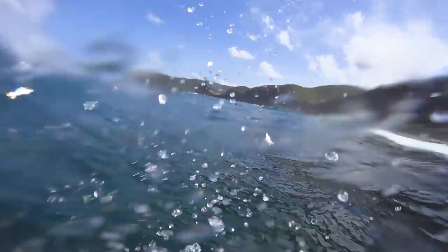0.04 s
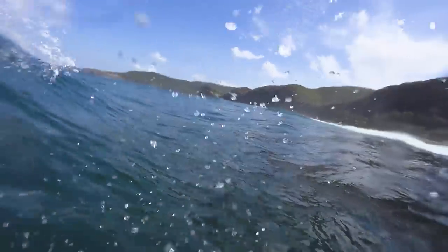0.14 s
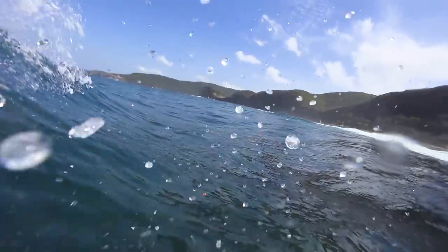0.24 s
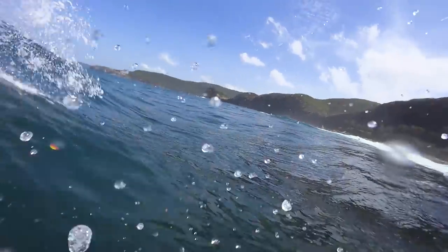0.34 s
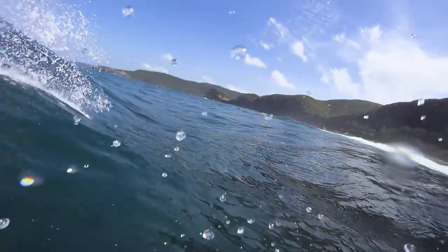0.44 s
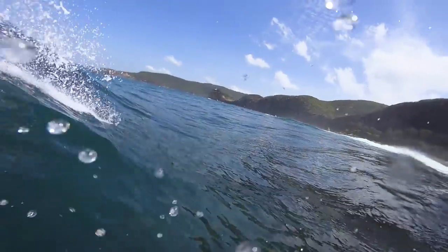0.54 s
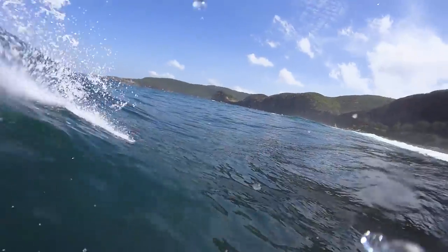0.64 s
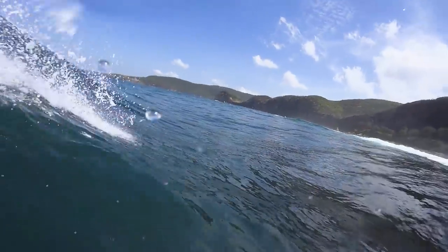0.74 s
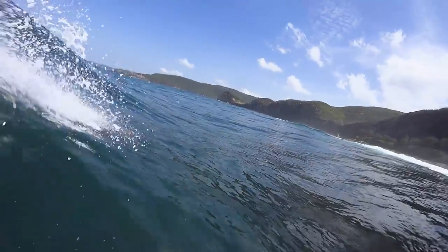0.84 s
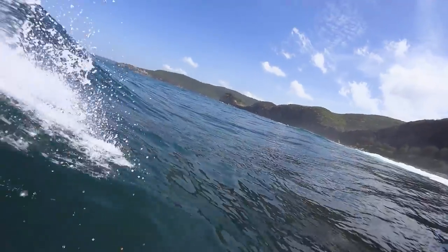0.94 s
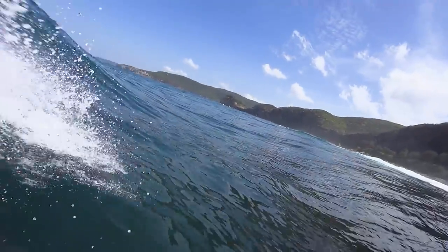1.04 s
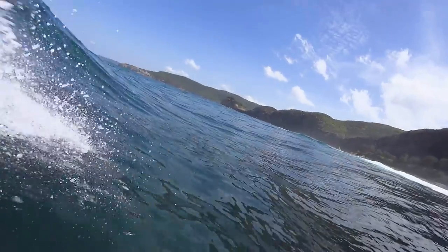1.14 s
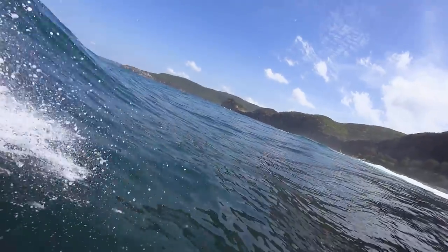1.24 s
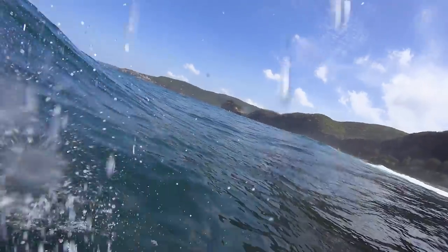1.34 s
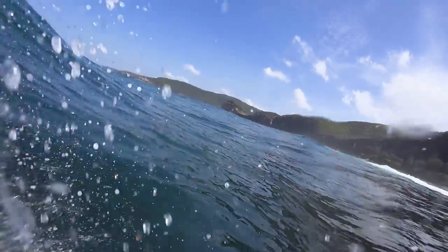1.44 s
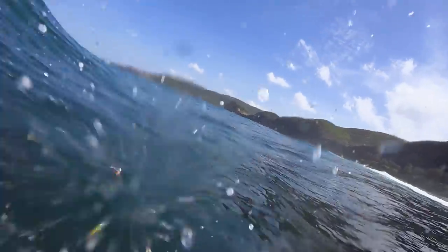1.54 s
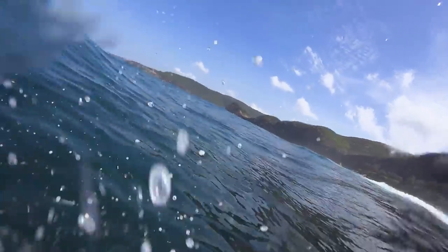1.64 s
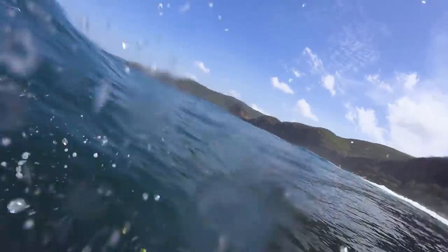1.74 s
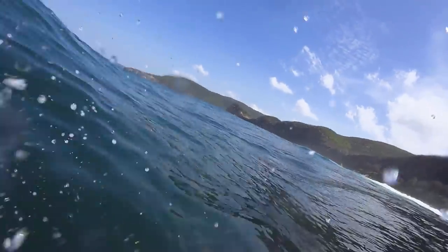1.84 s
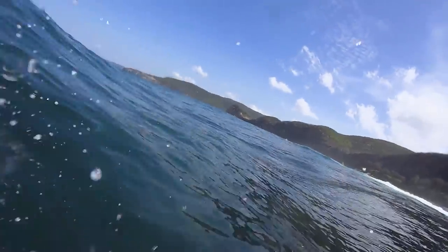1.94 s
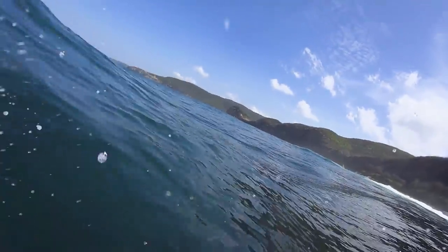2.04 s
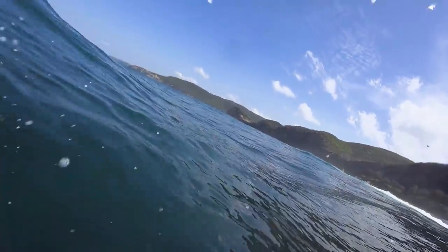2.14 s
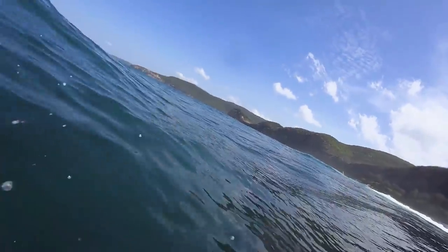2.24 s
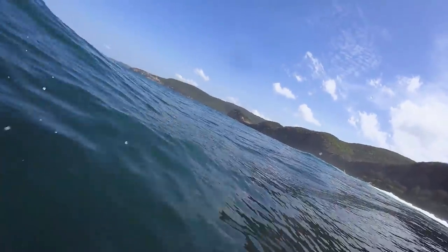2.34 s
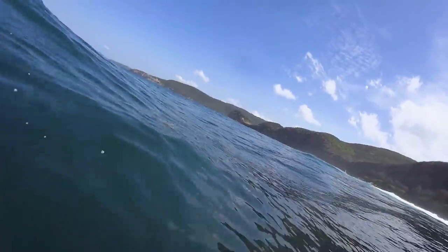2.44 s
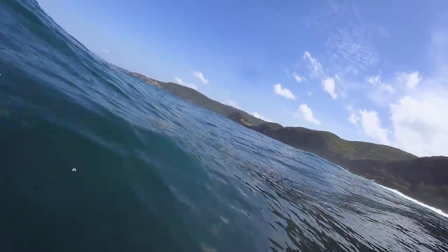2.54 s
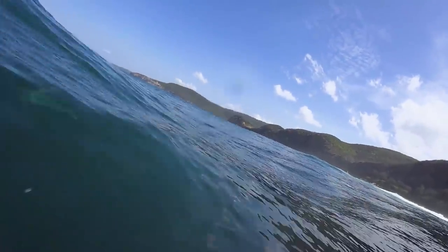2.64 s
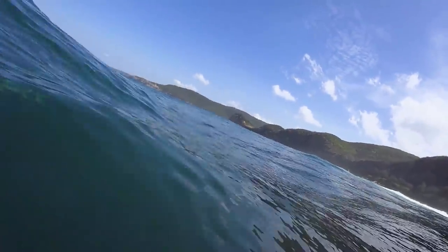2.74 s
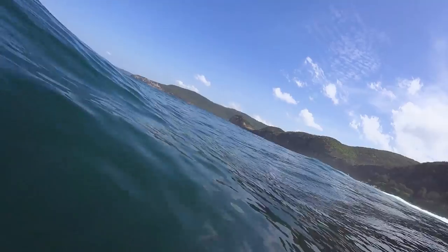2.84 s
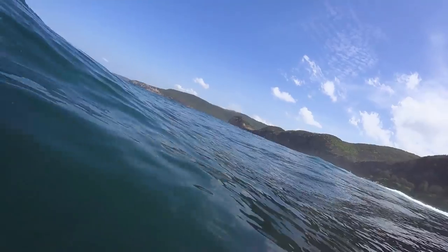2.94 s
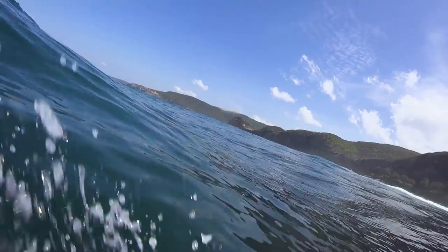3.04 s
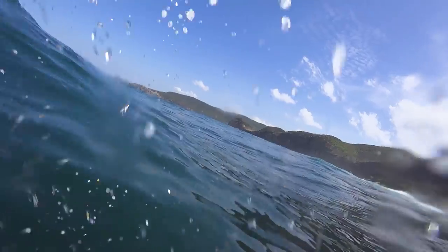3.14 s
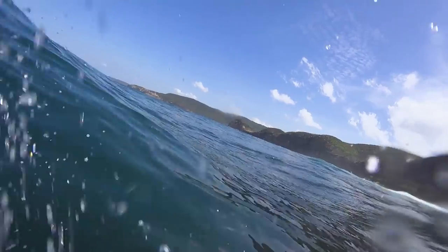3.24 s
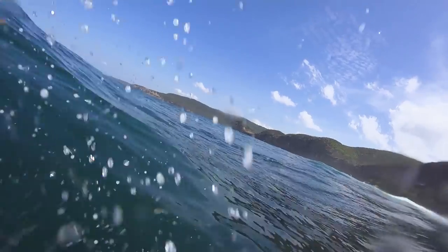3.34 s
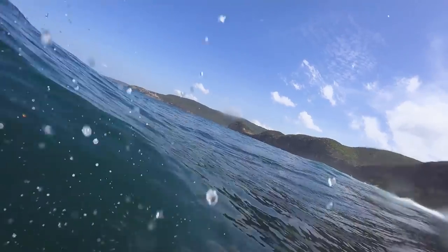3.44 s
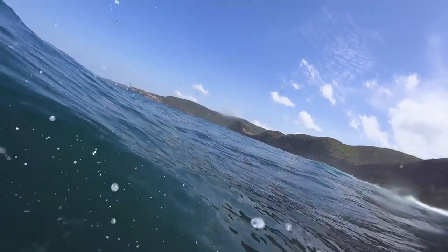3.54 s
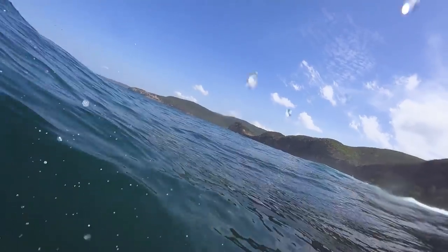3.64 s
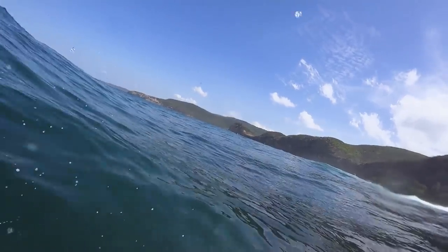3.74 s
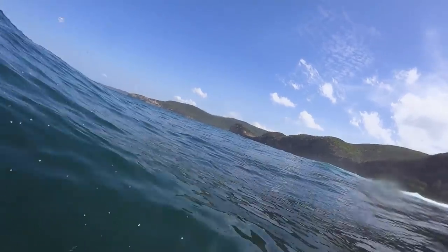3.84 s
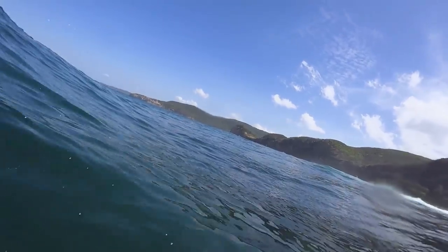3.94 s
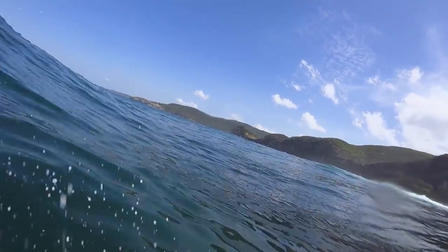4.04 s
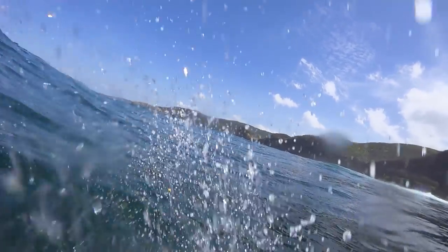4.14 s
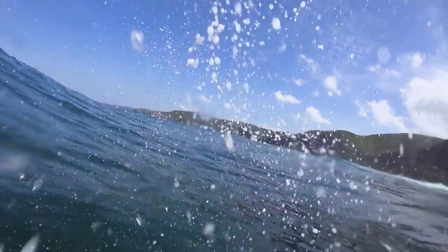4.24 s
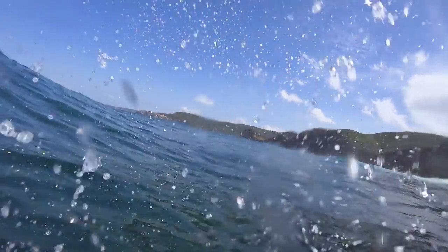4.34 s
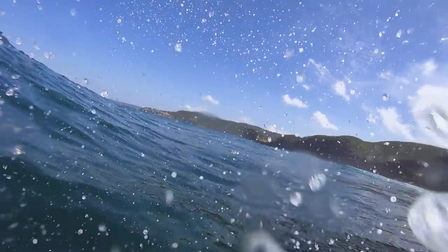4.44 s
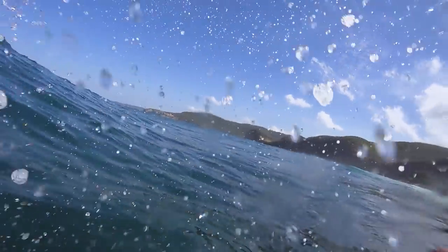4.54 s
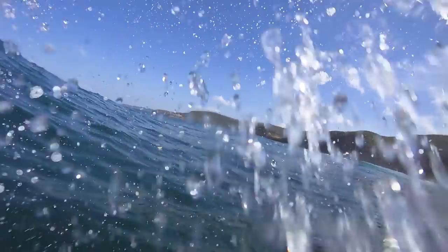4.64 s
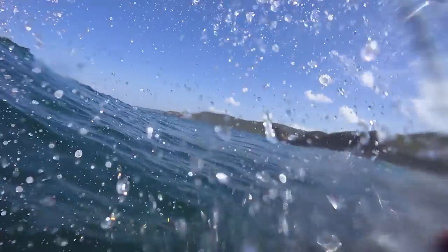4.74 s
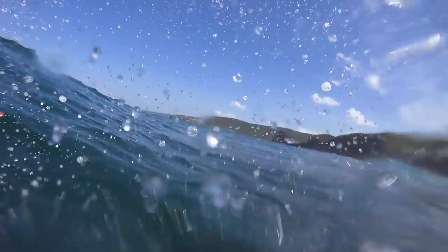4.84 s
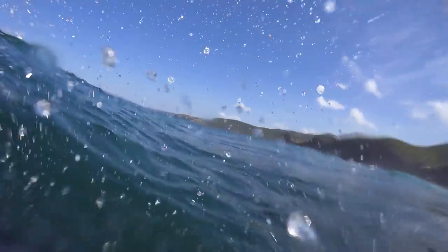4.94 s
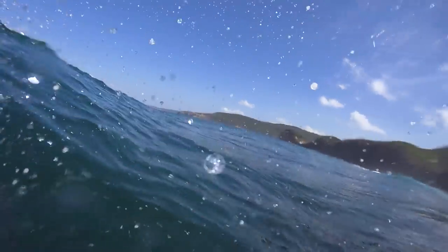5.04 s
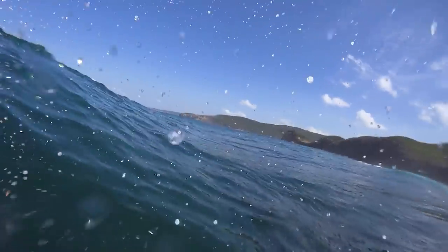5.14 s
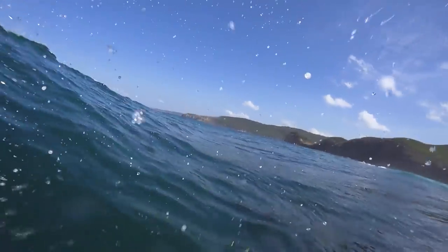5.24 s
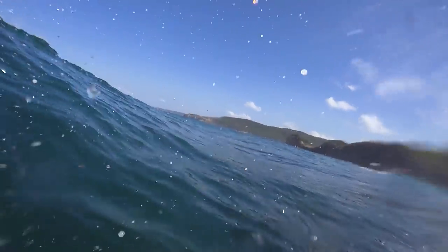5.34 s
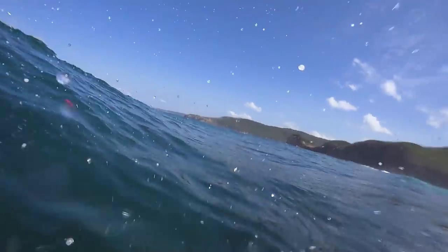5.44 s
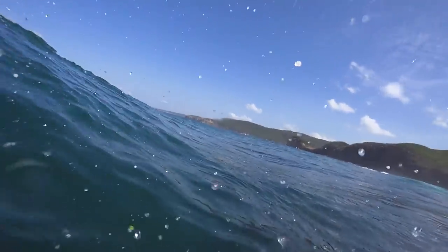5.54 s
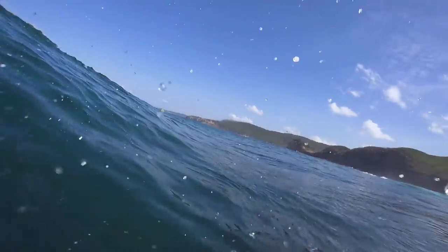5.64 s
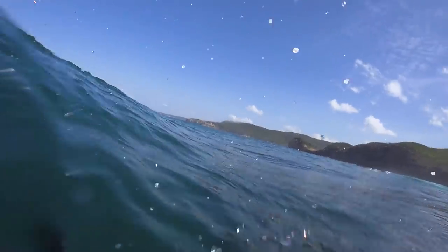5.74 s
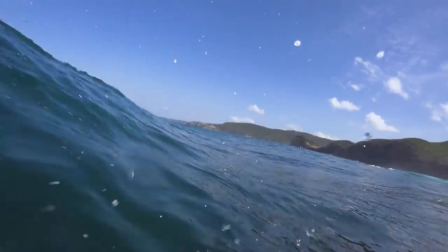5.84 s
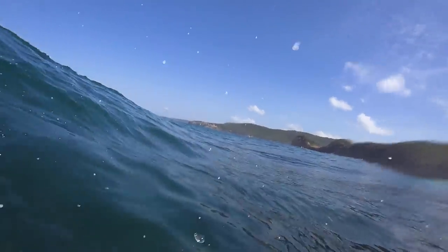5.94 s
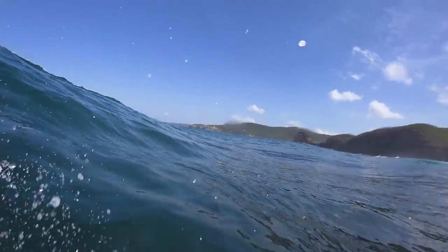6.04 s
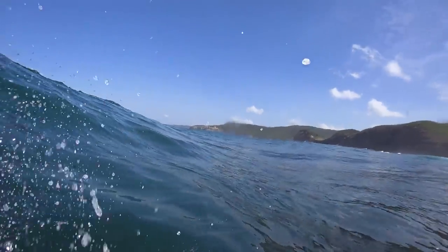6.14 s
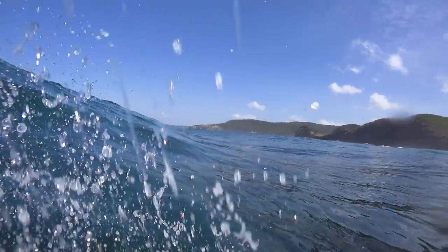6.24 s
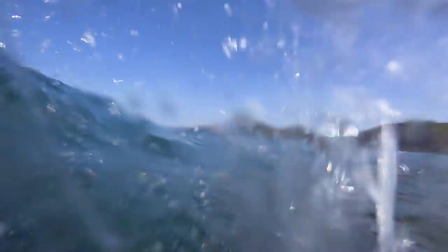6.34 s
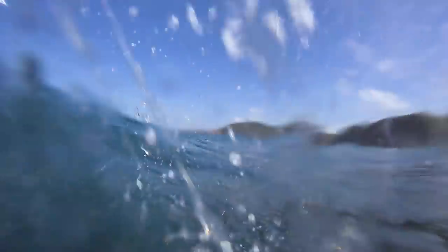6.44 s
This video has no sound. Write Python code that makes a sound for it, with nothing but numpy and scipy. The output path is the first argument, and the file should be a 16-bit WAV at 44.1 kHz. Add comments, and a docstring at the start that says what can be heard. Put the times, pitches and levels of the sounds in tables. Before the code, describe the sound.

A microphone in a sealed housing bobs on the ocean surface. A spatter of spray opens, then three stronger bouts of splashing hit the shell, with gurgling plops, fizzing whitewater and a low rumble as the swell shoves it. Quieter gaps hold gentle lapping, scattered drips and a very faint hiss of distant surf. After a calmer stretch, a sharp splash lands right at the end.

```python
"""Afloat beside a breaking wave

A camera in a sealed housing floats on the sea, its two microphone ports at the waterline.
Close up, spray slaps the housing in bursts, whitewater hisses, drops tap and air pockets plop;
the swell pushes the housing and shakes its mount. The ports hear the shell's low ring in nearly
opposite phase. Underneath lie lapping ripples, one faint hum and the hiss of distant surf."""
import sys
import numpy as np
from scipy import signal
from scipy.fft import rfft, irfft, next_fast_len
from scipy.io import wavfile
from scipy.ndimage import uniform_filter1d

SR = 44100
rng = np.random.default_rng(int(sys.argv[2]) if len(sys.argv) > 2 else 0)


def wrap_up_sound(samples):
    """Save the sound to the file named by the first command line argument, as 16-bit audio."""
    columns = np.atleast_2d(samples).T
    # keep every value between -1 and 1, then stretch to whole-number steps
    tamed = np.clip(columns, -1, 1)
    steps = np.round(tamed * 32767).astype(np.int16)
    wavfile.write(sys.argv[1], SR, steps)


N = 286209
FFT_SIZE = next_fast_len(N + SR // 4)

# water hitting the housing: start_s, level_db, thud_relative_db, spray_relative_db, length_s
SLAPS = [(0.01, -22.5, 9.5, -11.5, 0.0034), (0.045, -28.5, 1, -20, 0.0083), (0.064, -28.5, 0, -13, 0.0047),
         (0.07, -24, -0.5, -23, 0.0074), (0.148, -34.5, 9, -31, 0.015), (0.187, -27.5, -3, -10, 0.005),
         (0.215, -31.5, 8.5, -14, 0.017), (0.283, -38.5, 11, -10, 0.016), (1.456, -17.5, 1.5, -19.5, 0.014),
         (1.485, -17, 4.5, -34, 0.008), (1.519, -29, 16, -6, 0.0048), (1.531, -26.5, 21, -29, 0.0047),
         (1.549, -33.5, 5, -17, 0.0063), (1.658, -11, -5, -30, 0.0057), (1.696, -36.5, 10, -2, 0.0033),
         (1.76, -30, 10.5, -19, 0.016), (1.82, -39, 17, -30, 0.033), (3.121, -24, 7, -36, 0.0037),
         (3.198, -27, 12, -31, 0.019), (3.257, -15.5, -1, -15, 0.012), (3.29, -24, 12, -14, 0.0086),
         (3.42, -25, 9.5, -17, 0.012), (3.461, -30, 8, -33, 0.0032), (3.5, -31, 22, -41, 0.0059),
         (3.515, -26, 12.5, -33, 0.0068), (4.02, -34.5, 9.5, -14.5, 0.015), (4.168, -33, 12, -31.5, 0.12),
         (4.218, -21, 10.5, -15.5, 0.038), (4.249, -16.5, 2, -34, 0.025), (4.297, -18.5, 9.5, -16.5, 0.013),
         (4.33, -26, 17, -19, 0.017), (4.384, -29.5, 16, -13, 0.017), (4.415, -21.5, 6.5, -19.5, 0.011),
         (4.48, -34, 2.5, -11, 0.011), (4.502, -27, 4, -20.5, 0.022), (4.556, -23.5, 10.5, -19.5, 0.031),
         (4.581, -20.5, 0.5, -17.5, 0.017), (4.689, -25.5, -0.5, -15, 0.0098),
         (4.696, -16, 6.5, -13.5, 0.014), (4.752, -26.5, 6, -10.5, 0.033), (4.79, -31.5, 3, -18, 0.026),
         (5.148, -35.5, 2, -3, 0.0016), (5.437, -44, 5.5, -8.5, 0.009), (5.964, -39, 3, -18, 0.009),
         (6.406, -15, 5.5, -17.5, 0.0075), (6.423, -18, 6, -16, 0.024), (6.452, -23.5, 10, -13.5, 0.11)]
# the whitewater's hiss: time_s, level_db
HISS_LEVELS = [(0, -39), (0.33, -45.5), (0.7, -48), (1.43, -44), (1.49, -36.5), (1.62, -39.5),
               (1.92, -41.5), (2.05, -56), (2.85, -53), (3.02, -42.5), (3.45, -41.5), (3.65, -56),
               (4.1, -48.5), (4.25, -29), (4.45, -44), (4.77, -44), (4.86, -51), (6.0, -51.5),
               (6.15, -45.5), (6.38, -40.5), (6.49, -38)]
# surges of swell against the housing: start_s, hold_s, push_db, wobble_db
SURGES = [(0.0, 0.014, -22, -26.5), (0.227, 0.0078, -24, -23), (1.51, 0.037, -28.5, -22),
          (1.904, 0.042, -34, -29), (2.207, 0.025, -29, -39.5), (2.485, 0.057, -25, -37),
          (3.212, 0.17, -31, -26), (3.526, 0.078, -24, -24), (3.679, .18, -25.5, -25.5),
          (4.243, 0.22, -35, -30), (4.409, 0.019, -21, -14.5), (4.697, 0.056, -19, -21.5),
          (6.432, .06, -20.5, -20)]
# trapped air pockets, single drops and, near 70 Hz, the mount ringing low after hits: start_s, level_db,
# pitch_hz, glide_octaves
PLOPS = [(.011, -21.5, 2500, 0.22), (0.214, -11, 220, -1.4), (0.41, -24, 285, -0.46),
         (0.646, -36, 258, -0.07), (1.262, -30, 730, 0), (1.394, -29, 332, 0.024),
         (1.485, -15.5, 70, -0.17), (1.529, -17.5, 160, -.1), (1.653, -12, 1788, 0.022),
         (1.667, -19, 317, -0.28), (1.891, -17, 85.7, -0.43), (2.227, -28.5, 128.4, -0.38),
         (2.547, -31, 356, -0.2), (2.947, -32.5, 1870, -0.1), (3.26, -12.5, 342, -0.08),
         (3.289, -15, 351, -0.1), (3.508, -10.5, 71.7, 0.19), (3.53, -30, 3200, 0),
         (4.031, -31.5, 1914, -0.16), (4.3, -9, 938, -0.18), (4.427, -19, 340, 0.055),
         (4.44, -8.5, 73, -0.089), (4.555, -15.5, 340, -0.46), (4.637, -17.5, 155, -0.026),
         (4.71, -20, 63.6, 0.37), (4.948, -38, 945, 0), (5.297, -46.5, 4500, -0.18),
         (5.397, -42.5, 2580, 0.54), (5.5, -39, 813, -0.18), (5.657, -43, 1990, 0),
         (5.929, -28, 1960, -0.06)]
# a faint hollow hum: start_s, end_s, level_db, from_hz, to_hz
HUM = (2.64, 2.83, -44, 245, 230)
# resonances, five sets: centre_hz, width_hz, level_db
SHELL_MODES = [(165.5, 88, -2), (257.5, 74, -2.5), (340, 110.4, -2), (442, 104, -4)]  # the housing's low ring
PORT_MODES = [(573, 447, 5), (894, 580, -2.5), (1412, 410, 1.5), (1834, 470, 2), (2620, 550, -4)]  # ports and thin panels
SPRAY_MODES = [(3527, 1700, 4.5), (4600, 3800, -1.5), (6630, 600, -16)]  # the treble of the spray
HEAVE_MODES = [(13.6, 20.6, 0)]  # the swell's slow push
MOUNT_MODES = [(68.9, 28.5, 3.5), (99, 117, -10)]  # the mount's wobble
# the microphone pair: frequency_hz, likeness (0-1), left_lead_rad, left_over_right_db
PORT_PAIR = [(150, .92, 3.2, -1), (340, .86, 2.7, -2), (450, .9, 2.9, -1.5), (690, .87, 2.7, -2),
             (940, .85, 1.4, 0), (1200, .45, 1.8, -3), (1480, .9, 2.3, -2), (1950, .96, 1.6, -3),
             (2500, .75, 1.3, -5), (3100, .3, .8, 2), (3700, .68, -.2, 2), (5300, .3, -.6, 2),
             (7500, .55, -1, 3)]

SURGE_RISE_DB_PER_S, PUSH_FALL_DB_PER_S, WOBBLE_FALL_DB_PER_S = 422.5, 78, 129
CALM_PUSH_DB, CALM_WOBBLE_DB = 14.5, -1.5  # between surges, relative to the hiss
BOOM_OVER_HISS_DB, BOOM_OVER_WOBBLE_DB = 6.5, -7.5
PLOP_T60_S, PLOP_DAMPING = 0.035, 0.79  # ring time at 1 kHz; it shortens as this power of the pitch
LAPPING_DB, FAR_SURF_DB = -54, -66
CUTOFF_HZ = 7750


def slaps():
    """Water strikes right at the microphones: grainy bursts drive shell, ports and treble."""
    power, age = np.zeros((3, N + SR)), np.arange(SR // 8) / SR
    for start, db, thud_db, spray_db, length in SLAPS:
        span = max(length, .002) * np.array([[1.5], [1], [.9]])  # the shell rings on
        rise = 1 - np.exp(-age / (0.024 * span))
        burst = rise * gain_of(db + np.array([[thud_db], [0], [spray_db]]) - 5.53 * (age / span) ** 1.28)
        power[:, round(start * SR):][:, :len(age)] += burst ** 2
    clumps = [flicker(0.0021, 3.54), flicker(0.0021, 4.93), flicker(0.00047, 8.7)]
    envelope = np.sqrt(power[:, :N]) * clumps
    return envelope[:, None] * rng.standard_normal((3, 2, N))


def whitewater():
    """The wave breaks close by: a boom drives the shell, patchy hiss the ports and treble."""
    frames = N // 128 + 5
    a, b, c, d, patches = rng.standard_normal((frames, 257, 5)).T
    patches = uniform_filter1d(patches, 6, axis=0)  # across pitch
    patches = unit_rms(uniform_filter1d(patches, 20, axis=1))  # across time
    spectra = np.array([a + 1j * b, c + 1j * d]) * gain_of(0.65 * patches)
    hiss = unit_rms(signal.istft(spectra, nperseg=512, noverlap=384)[1][:, :N])
    foam = hiss * flicker(0.0034, 1.0) * gain_of(hiss_db())
    _, wobble_db = surge_levels()
    shaking = np.hypot(gain_of(hiss_db() + BOOM_OVER_HISS_DB), gain_of(wobble_db + BOOM_OVER_WOBBLE_DB))
    boom = rng.standard_normal((2, N)) * flicker(.03, 2.73) * shaking
    fizz = gain_of(-15.5) * foam[::-1]
    far_surf = gain_of(FAR_SURF_DB) * rng.standard_normal((2, N))
    return np.array([boom, foam, fizz + far_surf])


def hiss_db():
    """The whitewater's level at every sample."""
    return np.interp(np.arange(N) / SR, *np.transpose(HISS_LEVELS))


def swell():
    """Slow pushes, alike on both ports, and a damped wobble of the mount, nearer the right port."""
    push_db, wobble_db = surge_levels()
    shared, left, right, own_left, own_right = rng.standard_normal((5, N))
    push = ring(np.array([shared + .4 * left, shared + .4 * right]), HEAVE_MODES)
    push *= gain_of(push_db) * flicker(.06, 3.25)
    wobble = ring(np.array([left + 0.71 * own_left, left + 0.64 * own_right]), MOUNT_MODES)
    wobble *= gain_of(wobble_db + [[-3], [3]]) * flicker(0.043, 2.62)
    return push + wobble


def surge_levels():
    """Push and wobble in dB: every surge rises fast, holds and ebbs, added in power to the calm."""
    t = np.arange(N) / SR
    power = gain_of(hiss_db() + [[CALM_PUSH_DB], [CALM_WOBBLE_DB]]) ** 2
    fall = np.array([[PUSH_FALL_DB_PER_S], [WOBBLE_FALL_DB_PER_S]])
    for start, hold, *levels_db in SURGES:
        below_db = SURGE_RISE_DB_PER_S * np.maximum(start - t, 0) + fall * np.maximum(t - start - hold, 0)
        power += gain_of(np.array(levels_db)[:, None] - np.minimum(below_db, 200)) ** 2
    return 10 * np.log10(power)


def plops():
    """Trapped air, single drops and the mount's low ring after hits sound as dying tones: row 0 the low tones,
    row 1 the high drops."""
    out, age = np.zeros((2, N + SR)), np.arange(SR // 4) / SR
    for (start, db, hz, glide), phase in zip(PLOPS, rng.random(len(PLOPS))):
        t60 = PLOP_T60_S * (1000 / hz) ** PLOP_DAMPING
        pitch = hz * 2 ** (glide * np.minimum(age / t60 * 3, 1))
        envelope = (1 - np.exp(-age / (0.014 * t60))) ** 2 * gain_of(db - 60 * age / t60)
        tone = np.sin(2 * np.pi * (np.cumsum(pitch) / SR + phase))
        out[int(hz > 500), round(start * SR):][:len(age)] += envelope * tone
    return out[:, :N]


def droplets():
    """Small drops tap at scattered pitches, more of them the louder the whitewater; a few are large."""
    drops_per_s = 45 * gain_of(.5 * (hiss_db() + 55))
    size_db = 3 * np.minimum(rng.exponential(1, N), 3.5)
    hits = gain_of(-45.5 + .4 * (hiss_db() + 53) + size_db) * (rng.random(N) < drops_per_s / SR)
    pitch_index, out = rng.integers(0, 12, N), np.zeros(N)
    for k, hz in enumerate(np.geomspace(1500, 5500, num=12)):
        cycles = np.arange(300) / SR * hz
        tap = (1 - np.exp(-cycles)) * np.exp(-cycles / 2.5) * np.sin(2 * np.pi * cycles)
        tap *= (hz / 1900) ** -1.2  # smaller drops are fainter
        out += signal.oaconvolve(hits * (pitch_index == k), tap)[:N]
    return out


def hum():
    """A short, wavering tone that sinks a little."""
    start, end, db, from_hz, to_hz = HUM
    progress = np.clip((np.arange(N) / SR - start) / (end - start), 0, 1)
    tone = np.sin(2 * np.pi * np.cumsum(from_hz + (to_hz - from_hz) * progress) / SR)
    arch = np.sqrt(np.sin(np.pi * progress) + 1e-12) * (progress < 1)
    return gain_of(db) * arch * tone * flicker(0.017, 2.5)


def lapping():
    """Small ripples lap at the shell in a soft, lumpy gurgle."""
    return gain_of(LAPPING_DB) * ring(rng.standard_normal(N), SHELL_MODES) * flicker(0.004, 3.8)


def housing(drives):
    """Shell, port and treble drives, two unrelated signals each, ring their own sets of modes."""
    return sum(ring(d, modes) for d, modes in zip(drives, (SHELL_MODES, PORT_MODES, SPRAY_MODES)))


def microphone_ports(sound, other):
    """The left port hears one sound; the right hears it blended with the other and turned in phase."""
    log_hz = np.log(np.fft.rfftfreq(FFT_SIZE, 1 / SR) + 1)
    table_hz, *columns = np.transpose(PORT_PAIR)
    likeness, lead, pan_db = (np.interp(log_hz, np.log(table_hz), c) for c in columns)
    left, other = rfft(sound, FFT_SIZE), rfft(other, FFT_SIZE)
    right = (likeness * left + np.sqrt(1 - likeness ** 2) * other) * np.exp(-1j * lead)
    return irfft(np.array([left * gain_of(pan_db / 2), right * gain_of(-pan_db / 2)]), FFT_SIZE)[:, :N]


def ring(x, modes):
    """Resonances added in power, each applied twice for steep skirts; white noise keeps its level."""
    hz = np.fft.rfftfreq(FFT_SIZE, 1 / SR)
    each = [gain_of(2 * db) * (1j * hz * width / (centre ** 2 - hz ** 2 + 1j * hz * width)) ** 2
            for centre, width, db in modes]
    power = sum(abs(mode) ** 2 for mode in each)
    response = np.sqrt(power / power.mean()) * np.exp(1j * np.angle(sum(each)))
    return irfft(rfft(x, FFT_SIZE) * response, FFT_SIZE)[..., :N]


def flicker(width_s, depth_db):
    """A random gain that changes within about width_s."""
    size = max(round(width_s * SR), 1)
    drift = uniform_filter1d(uniform_filter1d(rng.standard_normal(N), size), size)
    return unit_rms(gain_of(depth_db * unit_rms(drift)))


def gain_of(db):
    """Decibels to gain."""
    return 10 ** (np.asarray(db) / 20)


def unit_rms(x):
    """Scales to rms 1."""
    return x / np.sqrt(np.mean(x ** 2) + 1e-20)


def scene():
    """Splashes pass the ports; swell, the low tones of air pockets and the ringing mount, hum and lapping reach
    both membranes directly."""
    low_tones, drops = plops()
    water = housing(whitewater() + slaps()) + drops + droplets()
    lean_right = gain_of([[-1.5], [1.5]])
    return microphone_ports(*water) + swell() + (low_tones + hum() + lapping()) * lean_right


def record(dry):
    """The camera clips the loudest slaps, then cuts the top of the treble."""
    clipped = np.clip(dry, -.94, .94)
    lowpass = signal.firwin(301, CUTOFF_HZ, window=("kaiser", 9), fs=SR)
    return signal.oaconvolve(clipped, lowpass[None], "same")


dry = scene()
out = record(dry)
wrap_up_sound(out)
```